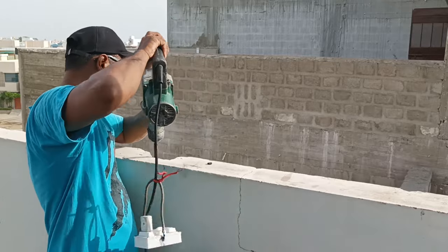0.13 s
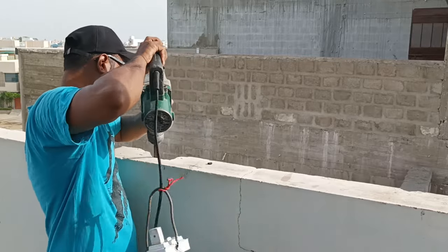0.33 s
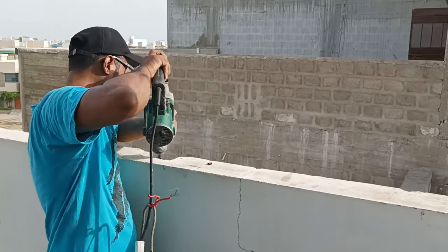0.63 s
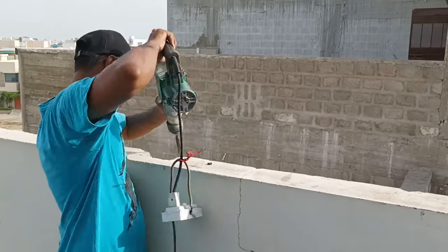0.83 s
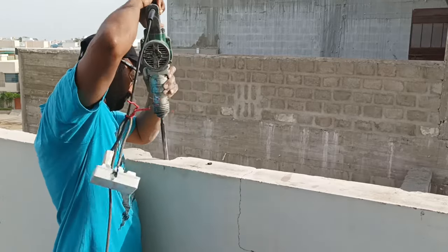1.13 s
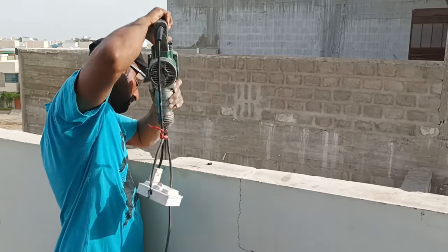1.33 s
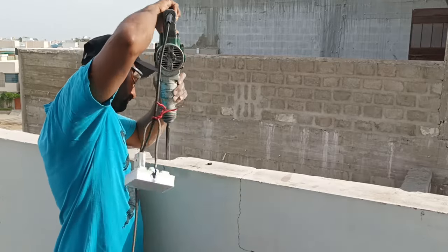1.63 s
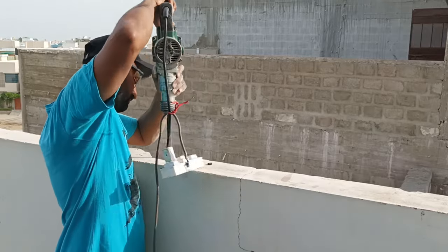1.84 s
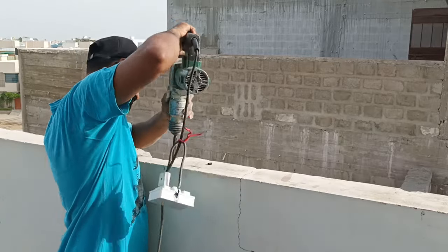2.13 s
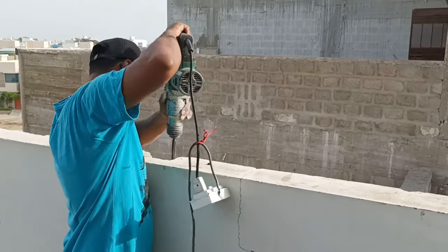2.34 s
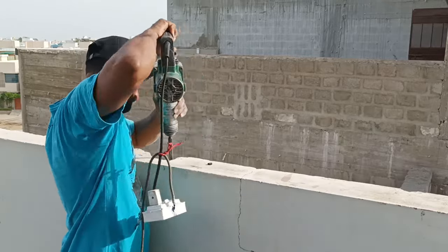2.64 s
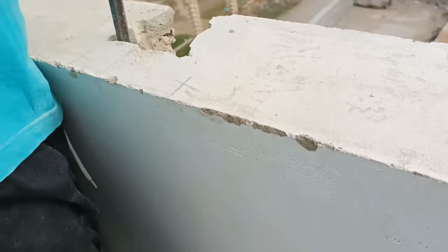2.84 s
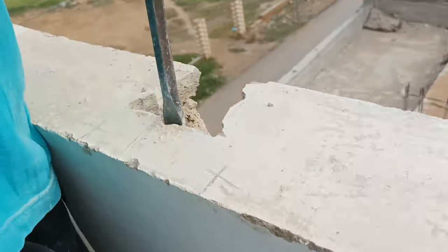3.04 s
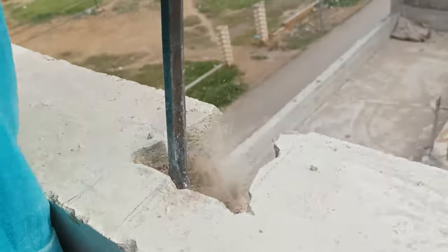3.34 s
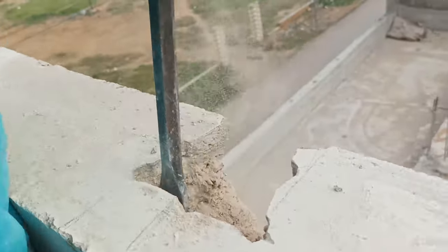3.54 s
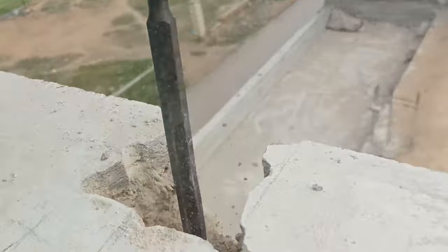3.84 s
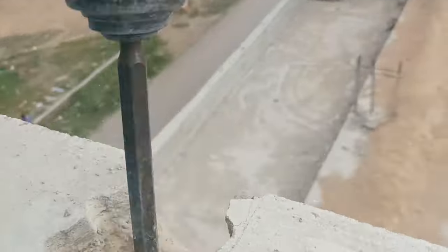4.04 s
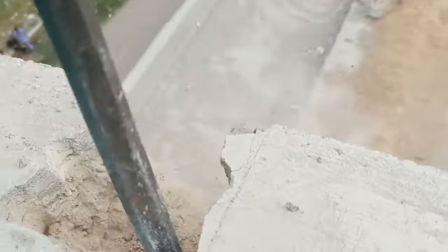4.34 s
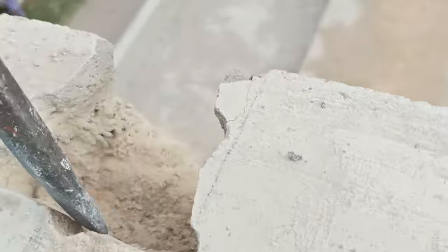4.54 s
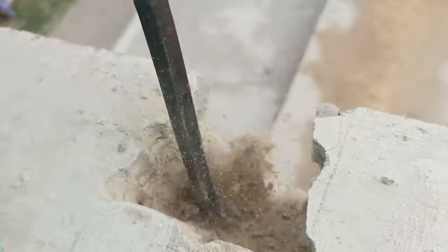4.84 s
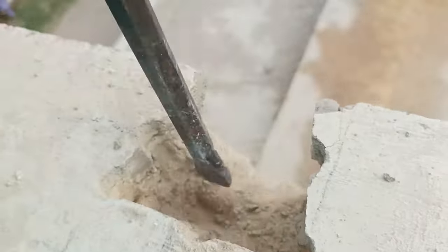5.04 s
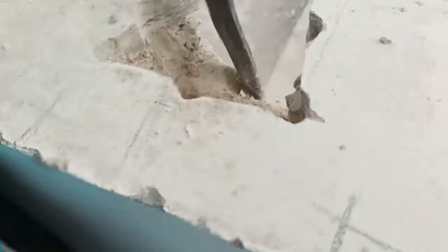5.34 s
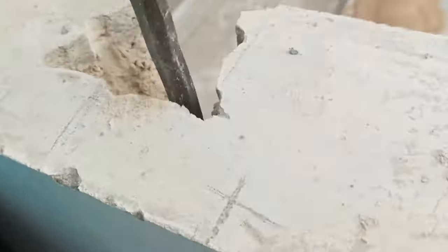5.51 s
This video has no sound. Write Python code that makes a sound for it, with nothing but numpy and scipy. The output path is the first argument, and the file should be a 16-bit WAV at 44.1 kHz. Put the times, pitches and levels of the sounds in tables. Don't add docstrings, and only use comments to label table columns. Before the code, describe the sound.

An electric hammer chisels a concrete parapet on an open roof. From 0 to 2.77 s it is a few steps away: steady fan and gear hiss with a rapid metallic rattle, about a hundred blows a second. A thin motor hum opens it, then a long skipping push from 0.1 to 0.65 s makes the wall buzz and boom. Light dabs and a sharp right-hand knock come near 0.9-1.0 s, a firm push at 1.33 s and a longer one at 2.2 s, with hum and small wind bumps between. At 2.77 s the sound cuts and quickly swells into a louder, brighter close view. Short crunching bites repeat, each puffing low air against the left microphone. The rattle quickens around 4-4.9 s, with thin high grit squeals and deeper body throb, then slows. A knock hits left at 3.65 s; a loud one cracks right at 5.33 s. The rattle continues to the end near 5.67 s.

```python
import sys
import numpy as np
from scipy import signal
from scipy.fft import rfft, irfft
from scipy.io import wavfile
from scipy.ndimage import uniform_filter1d

SR = 44100
rng = np.random.default_rng(int(sys.argv[2]) if len(sys.argv) > 2 else 0)


def undo_db(level):
    steps = np.asarray(level, float) / 20
    return 10 ** steps


def transcribe(u):
    v = np.clip(np.atleast_2d(u).T, -1, 1)
    q = np.round(v * 32767).astype(np.int16)
    wavfile.write(sys.argv[1], SR, q)


N = 250047
TIME = np.arange(N) / SR
SCENE_CHANGE_S = 2.766
HOP, FRAME = 64, 256


def evened(x):
    return x / np.sqrt(np.mean(x ** 2) + 1e-20)


def read(points, hz):
    f, value = np.transpose(points)
    return np.interp(np.log(hz + 1), np.log(f + 1), value)


def curves(tables, t):
    s, *columns = np.vstack(tables).T
    return [np.interp(t, s, c) for c in columns]


def far_or_near(values, t):
    far, near = values
    return np.where(t < SCENE_CHANGE_S, far, near)


def fade_in_db(t):
    since = t - SCENE_CHANGE_S
    return -26 * np.exp(-np.maximum(since, 0) / 0.053) * (since >= 0)


def slow(shape, *sizes):
    field = rng.standard_normal(shape)
    for axis, size in enumerate(sizes):
        for _ in range(2):
            field = uniform_filter1d(field, size, axis)
    return evened(field)


def resonate(x, hz, width):
    turn = np.exp(2j * np.pi * np.cumsum(hz * np.ones(len(x))) / SR)
    r = np.exp(-np.pi * width / SR)
    return 2 * (turn * signal.lfilter([1 - r], [1, -r], x / turn)).real


def pair(sources, shape_db, band, same, lag, pan_db):
    hz, t, (shared, *scattered) = signal.stft(sources, SR, nperseg=FRAME, noverlap=FRAME - HOP)
    rows = hz[:, None]
    gain = undo_db(shape_db(rows, t))
    inside = (hz > band[0]) & (hz < band[1])
    gain /= np.sqrt(2 * (gain[inside] ** 2).sum(0) / FRAME)
    like = np.clip(far_or_near([read(s, rows) for s in same], t), 0, 1)
    delay = np.exp(-1j * np.pi * rows * far_or_near(lag, t) / SR)
    side = undo_db(pan_db(rows, t) / 2)
    ridges = undo_db(2.2 * slow((2, len(hz), len(t) // 8 + 1), 1, 2, 12))
    ridges = ridges.repeat(8, axis=2)[..., :len(t)]
    ports = []
    for d, own, g in zip((delay, 1 / delay), scattered, (side, 1 / side)):
        mixed = np.sqrt(like) * shared * d + np.sqrt(1 - like) * own
        ports.append(mixed * g * gain)
    out = signal.istft(ridges * ports, SR, nperseg=FRAME, noverlap=FRAME - HOP)[1][:, :N]
    return signal.sosfilt(signal.butter(4, 240, "high", fs=SR, output="sos"), out)


# (time [s], blows per second [1/s])
STRIKER_SPEED = [(0, 97), (.2, 104), (.28, 112), (.34, 132), (.58, 129.6), (.7, 100.4), (1.3, 110),
                 (1.36, 92), (1.45, 102), (2.3, 107), (2.5, 126), (2.9, 122), (3.4, 116), (3.7, 126),
                 (4.06, 165), (4.9, 164), (5.3, 114), (5.67, 90)]


def blows(unsteady=.033, spread_db=1.6):
    speed = curves([STRIKER_SPEED], TIME)[0] * (1 + unsteady * slow(N, 600))
    turns = np.cumsum(speed) / SR
    hit = np.diff(np.floor(turns), prepend=0) > 0
    return turns, hit * undo_db(spread_db * rng.standard_normal(N))


def rattled(train, decay_s, share):
    flare = signal.lfilter([1], [1, -np.exp(-1 / (decay_s * SR))], train)
    gate = 1 - share + share * evened(flare)
    return evened(gate) * rng.standard_normal((3, N))


# (time [s], level [dB])
TIP_REST = [(0, -45), (.12, -33), (1.35, -40), (1.8, -40), (2.2, -43), (2.3, -31.5), (2.766, -41),
            (2.767, -43), (3.3, -46), (3.9, -39), (4.7, -30), (5.2, -33.5), (5.67, -36.5)]
# (start [s], length [s], wall level [dB])
PUSHES_FAR = [
    (.085, 0.58, -27.5),
    (.9, 0.042, -38),
    (1.0, 0.053, -39),
    (1.33, 0.18, -30.5),
    (2.215, 0.25, -29),
]
# (start [s], length [s], wall level [dB], air level [dB])
PUSHES_NEAR = [(2.859, 0.074, -27, -38), (3.361, 0.11, -28.5, -36.5), (3.633, 0.087, -27.5, -37.5),
               (3.857, 0.072, -32, -31.5), (4.069, 0.068, -28.5, -33), (4.295, 0.091, -27, -32.5),
               (4.509, 0.029, -24.5, -32), (4.687, .04, -27.5, -35), (4.882, 0.18, -24.5, -37.5),
               (5.245, 0.11, -24, -34.5), (5.345, 0.062, -25.5, -50), (5.58, .12, -28, -37)]


def bite(t):
    attack_s, attack_db = (0.058, 0.048), (-16, -4.5)
    release_db_per_s, ease_s = (65, 127), (0, -0.022)
    rest = undo_db(curves([TIP_REST], t)[0])
    total = rest.copy()
    for near, pushes in enumerate((PUSHES_FAR, PUSHES_NEAR)):
        in_view = far_or_near((0, 1), t) == near
        for start, length, db, *_ in pushes:
            rise_db = attack_db[near] * np.clip(1 - (t - start) / attack_s[near], 0, 1)
            fall_db = release_db_per_s[near] * np.maximum(t - start - length - ease_s[near], 0)
            total = np.maximum(total, (t >= start) * in_view * undo_db(db + rise_db - fall_db))
    skips = sum(np.exp(-.5 * ((t - 0.287 - k * .094) / 0.015) ** 2) for k in range(4))
    total = total * undo_db(-4 * skips)
    return 20 * np.log10(total) + fade_in_db(t), 20 * np.log10(total / rest)


# (frequency [Hz], level [dB])
AIR_SPECTRUM = [(25, -21), (70, -23.5), (130, -2.5), (300, -1.5), (600, -9), (1200, -11), (3000, -13),
                (16000, -44)]
# (start [s], length [s], level [dB])
GUSTS = [(-.01, 0.047, -37.5), (0.127, .04, -45), (0.174, 0.62, -56.5), (1.327, 0.097, -40.5),
         (1.46, .1, -51), (1.765, .1, -47.5), (1.964, .04, -46), (2.126, .03, -55), (2.242, .25, -50),
         (2.604, 0.051, -52), (2.697, 0.06, -51.5), (3.795, 0.014, -43)]


def air():
    hz = np.fft.rfftfreq(N, 1 / SR)
    lumps = undo_db(2.47 * slow((2, N), 1, 200))
    z = rfft(lumps * rng.standard_normal((2, N))) * undo_db(read(AIR_SPECTRUM, hz))
    rumble = irfft(z * ((hz > 70) & (hz < 280)), N)
    z /= np.sqrt(np.mean(rumble ** 2))
    closeness_db = far_or_near((-7, .3 * (curves([TIP_REST], TIME)[0] + 36)), TIME)
    level = undo_db(-65 + closeness_db + fade_in_db(TIME))
    for start, length, *_, db in [*GUSTS, *PUSHES_NEAR]:
        opening = np.clip((TIME - start) / 0.0073, 0, 1)
        closing = np.clip((start + length - TIME) / 0.02 + 1, 0, 1)
        sag_db = 14 * np.clip(TIME - start, 0, 1)
        level = level + opening * closing * undo_db(db - sag_db)
    return irfft(z, N) * level * undo_db(np.array([[5.5], [-9]]))


# (start [s], end [s], start frequency [Hz], end frequency [Hz], level [dB])
HUMS_AND_SQUEALS = [(0, .11, 925, 922, -44), (1, 1.13, 930, 925, -47), (1.17, 1.33, 915, 915, -42),
                    (1.6, 1.8, 925, 930, -52), (1.85, 2.07, 930, 930, -49), (2.11, 2.23, 922, 915, -45),
                    (1.02, 1.18, 450, 448, -52), (1.62, 1.72, 15600, 13800, -56),
                    (2.17, 2.195, 8400, 8600, -42), (1.815, 1.845, 10900, 11200, -44),
                    (2.19, 2.235, 7600, 7450, -42), (3.19, 3.3, 15700, 14800, -43),
                    (3.95, 4.05, 12300, 13300, -40), (4.15, 4.23, 12800, 13400, -39),
                    (4.35, 4.52, 12200, 13800, -38), (4.55, 4.7, 13200, 14200, -39),
                    (4.72, 4.85, 13500, 14100, -40)]


def tones():
    out = np.zeros(N)
    waver = 1 + 0.00207 * slow(N, 300)
    for start, end, hz0, hz1, db in HUMS_AND_SQUEALS:
        u = np.clip((TIME - start) / (end - start), 0, 1)
        hz = (hz0 + (hz1 - hz0) * u) * waver
        swell = abs(np.sin(np.pi * u)) ** .3 * (u < 1)
        out += undo_db(db + 3.5) * swell * np.sin(2 * np.pi * np.cumsum(hz) / SR)
    return out


# (time [s], peak level [dB], frequency [Hz], left-right [dB], 60 dB decay [s])
KNOCKS = [
    (0.911, -10, 1327, -7, 0.014),
    (0.9137, -24, 577, 1, 0.038),
    (1.018, -19, 448, 3, 0.011),
    (1.031, -23, 473, 2, 0.026),
    (1.331, -42, 397, -5, 0.026),
    (3.647, -13, 328, 26, 0.027),
    (5.3256, 5, 1045, -32, 0.013),
]


def knocks():
    out = np.zeros((2, N))
    for s, db, hz, pan_db, t60 in KNOCKS:
        t = np.maximum(TIME - s, 0)
        turns = hz * (0.66 * t + 0.0014 * (1 - np.exp(-t / 0.00097)))
        onset = 1 - np.exp(-t / 0.00076)
        knock = undo_db(db + 1 - 60 * t / t60) * np.sin(2 * np.pi * turns) * onset
        out += knock * undo_db(pan_db / 2 * np.array([[1], [-1]]) - abs(pan_db) / 2)
    return out


# (start [s], end [s], level [dB])
ROCKING = [
    (0.344, .72, -53),
    (1.38, 1.45, -52),
    (2.4, 2.55, -51),
    (3.998, 4.4, -53),
    (4.4, 5, -47.5),
]


def thud(turns):
    level_db = np.full(N, -66.0)
    for start, end, db in ROCKING:
        rise_db = 150 * np.maximum(start - TIME, 0)
        fall_db = 90 * np.maximum(TIME - end, 0)
        level_db = np.maximum(level_db, db - rise_db - fall_db)
    return undo_db(level_db + 0.5) * np.sin(2 * np.pi * turns)


# (frequency [Hz], level [dB])
WALL_FAR = [(90, -30), (350, 0.5), (620, -1), (950, 1.5), (1200, -1), (1600, 3.5), (1950, 5), (2250, -2.5),
            (2600, -0.5), (3300, 4.5), (5000, -9), (16000, -35)]
WALL_NEAR = [(90, -18), (500, -2), (1000, -1.5), (1500, 0.5), (3200, 2.5), (4500, 4), (16000, -17)]
# (frequency [Hz], width [Hz], level [dB])
WALL_MODES = [(650, 200, 0), (850, 81, -2), (1217, 94, 7), (1413, 32, -0.5), (1650, 52, -16),
              (1967, 68, 0.5)]
# (frequency [Hz], likeness [0-1])
WALL_SAME = [
    [(300, 1), (1500, 0.3), (3000, 0.35)],
    [(300, 0.33), (1500, 0.36), (3700, 0.13)],
]


def wall(train):
    bite_db = bite(TIME)[0]
    drive = rattled(train, 0.012, .3)
    clean = np.clip((bite_db + 40) / 14, 0, 1) * far_or_near((.43, .25), TIME)
    slab = rng.standard_normal(900) * np.exp(-np.arange(900) / 200)
    slab = irfft(np.exp(1j * np.angle(rfft(slab))))
    push = signal.lfilter([1], [1, -.85], signal.oaconvolve(train, slab)[:N])
    drive[0] = clean * 1.7 * evened(push) + np.sqrt(1 - clean ** 2) * drive[0]
    ring = sum(undo_db(db) * evened(resonate(drive[0], hz, width)) for hz, width, db in WALL_MODES)
    drive[0] = evened(drive[0] + .5 * clean * ring * (TIME < SCENE_CHANGE_S))

    def shape_db(hz, t):
        return far_or_near((read(WALL_FAR, hz), read(WALL_NEAR, hz)), t)

    def pan_db(hz, t):
        return 2.3

    lag = (3.3, -5.5)
    return undo_db(bite_db - 0.08) * pair(drive, shape_db, (450, 1900), WALL_SAME, lag, pan_db)


# (time [s], level [dB], left-right [dB], low ring frequency [Hz], high ring frequency [Hz])
TOOL_MOVES = [
    [(0.0, -30, 2, 5650, 7150), (0.08, -31.5, 2.5, 5680, 6660), (0.17, -26, 1.5, 6030, 6450),
     (0.7, -27.5, 3, 5760, 6770), (1.31, -32.5, 3, 5295, 6600), (1.345, -28, 0.5, 5770, 6660),
     (1.64, -27.5, 2.5, 5650, 6750), (2.2, -31, 3, 5237, 7200), (2.24, -27, 2, 5500, 6600),
     (2.766, -27.5, 3.5, 5900, 6760)],
    [(2.767, -21, -2.5, 5094, 7200), (3.6, -22.5, -2.5, 5613, 7294), (4.1, -19, -3, 6370, 7600),
     (4.45, -19.5, -8, 5300, 7230), (4.97, -18.5, -8, 5300, 7700), (5.15, -21.5, -9, 5460, 5700),
     (5.37, -14, -3.5, 5637, 5897), (5.5, -19.5, -6.5, 5905, 7076)],
]
# (frequency [Hz], level [dB])
TOOL_FAR = [(100, 4), (500, -41.5), (2300, -8), (2900, 0.5), (4000, -6.5), (5500, -2), (7200, -3.5),
            (8200, -4), (10500, -9), (13000, -13), (16000, -11.5)]
TOOL_NEAR = [(100, -17), (900, -30), (1400, -14.5), (2050, -5.5), (2600, -8), (3300, -2.5), (3800, -4.5),
             (4600, 1.5), (5600, 1), (8200, -2), (9300, -2), (12000, -11), (16000, -18.5)]
# (frequency [Hz], left-right [dB])
SHADOW_FAR = [(500, 0.5), (1500, 9.5), (2500, -5), (4500, 1.5), (6300, -4), (8000, -3), (11000, -2),
              (13000, -11), (16000, -2)]
SHADOW_NEAR = [(500, 3), (2000, 5), (4000, 3.5), (5000, -6), (6300, -4.5), (8200, -4), (9500, 3.5),
               (11500, -7), (14000, -1), (16000, -3)]
# (frequency [Hz], likeness [0-1])
TOOL_SAME = [
    [(500, .85), (2500, .75), (5000, .48), (8000, .42), (15000, .35)],
    [(500, .85), (2500, .9), (3800, .95), (5000, .5), (8000, .38), (15000, .35)],
]


def tool(train):
    def shape_db(hz, t):
        level_db, _, low_hz, high_hz = curves(TOOL_MOVES, t)
        push_db = bite(t)[1]
        bright_db = far_or_near((-4, -3), t) + far_or_near((0.051, 0.14), t) * push_db
        growl_db = far_or_near((-3, 0.5), t) + far_or_near((0.22, 0.17), t) * push_db
        bright_db += 0.32 * (level_db + 26.5) * (t < SCENE_CHANGE_S)
        usual = far_or_near((read(TOOL_FAR, hz), read(TOOL_NEAR, hz)), t)
        top = bright_db * np.clip((hz - 8500) / 2000, 0, 1)
        low = growl_db * np.exp(-((hz - 3000) / 900) ** 2)
        high_hz = high_hz * far_or_near((1, 1.08), t)
        rings = 2.5 * np.exp(-((hz - low_hz) / 450) ** 2)
        rings = rings + 3 * np.exp(-((hz - high_hz) / 400) ** 2)
        rings -= 4 * np.clip((hz - high_hz - 400) / 500, 0, 1) * np.clip((10500 - hz) / 1500, 0, 1)
        return usual + top + low + rings

    def pan_db(hz, t):
        turning = curves(TOOL_MOVES, t)[1] + far_or_near((0, 3.5), t)
        return far_or_near((read(SHADOW_FAR, hz), read(SHADOW_NEAR, hz)), t) + turning

    uneven = train * undo_db(4 * np.clip(rng.standard_normal(N), -2, 1.6))
    drive = rattled(uneven, .0025, .26)
    level = undo_db(curves(TOOL_MOVES, TIME)[0] + fade_in_db(TIME) + 4.5)
    lag = (11, -5.8)
    return level * pair(drive, shape_db, (4300, 9000), TOOL_SAME, lag, pan_db)


def scene():
    turns, train = blows()
    return air() + tones() + knocks() + thud(turns) + wall(train) + tool(train)


def roll_off(x):
    return signal.sosfilt(signal.butter(12, 17050, fs=SR, output="sos"), x)


def record(dry):
    squashed = dry / (1 + (abs(dry) / .9) ** 4) ** .25
    band_limit = signal.firwin(511, 15850, window=("kaiser", 9), fs=SR)
    x = signal.oaconvolve(squashed, band_limit[None], "same")
    return roll_off(np.clip(x, -1, 1))


dry = scene()
out = record(dry)
transcribe(out)
```